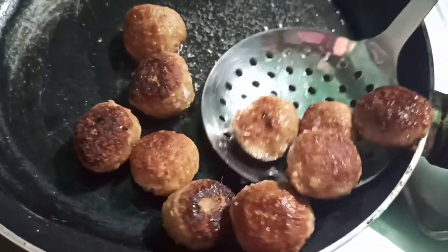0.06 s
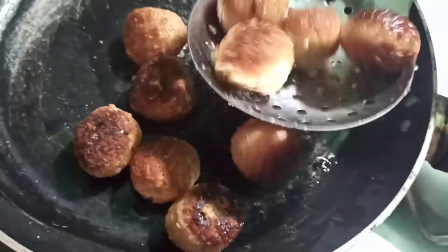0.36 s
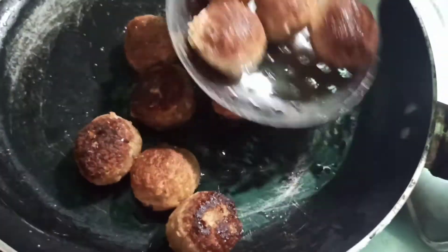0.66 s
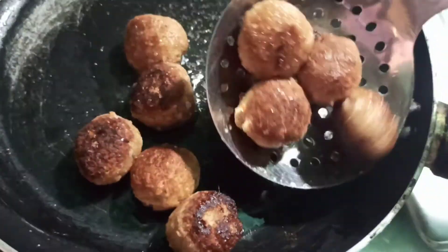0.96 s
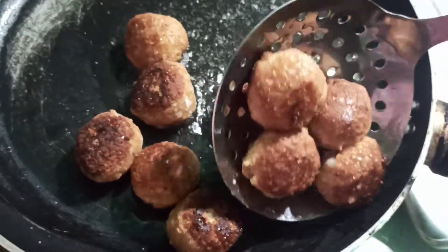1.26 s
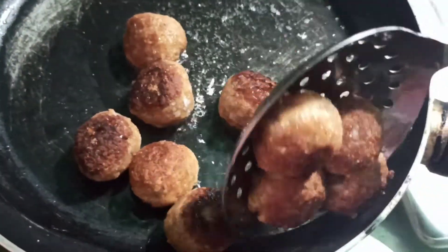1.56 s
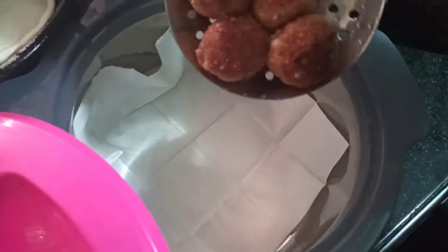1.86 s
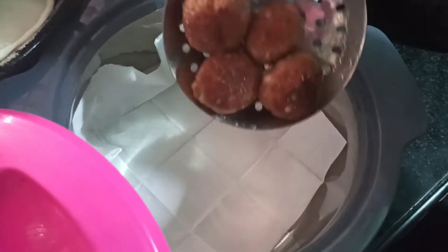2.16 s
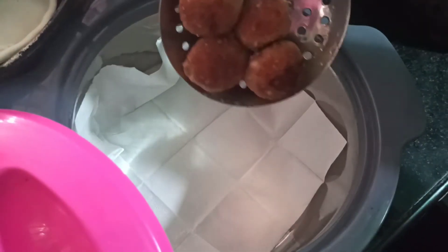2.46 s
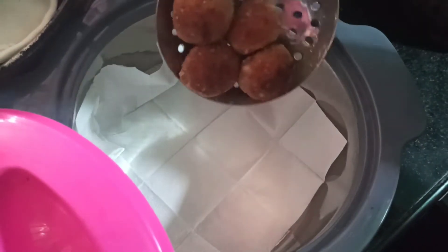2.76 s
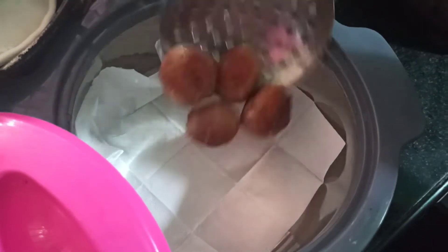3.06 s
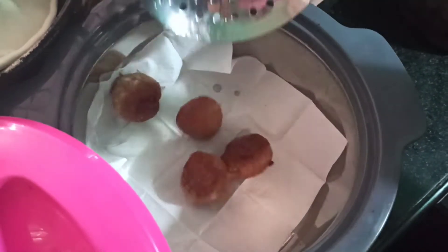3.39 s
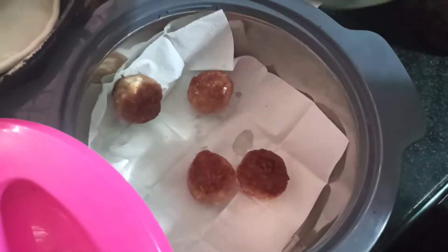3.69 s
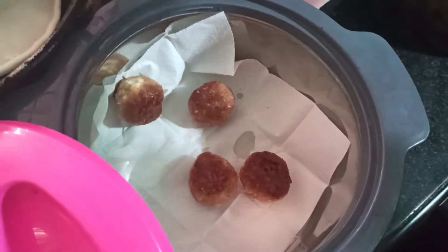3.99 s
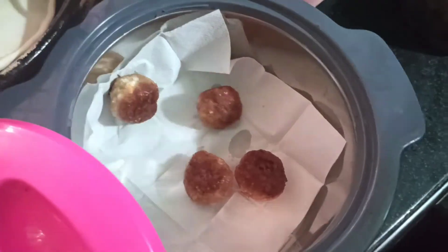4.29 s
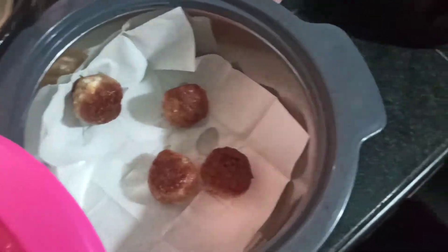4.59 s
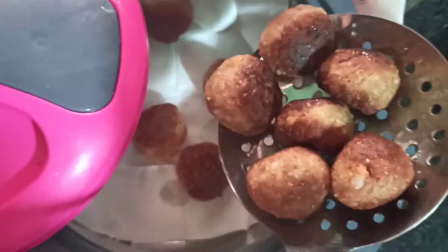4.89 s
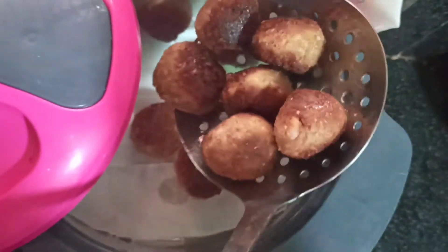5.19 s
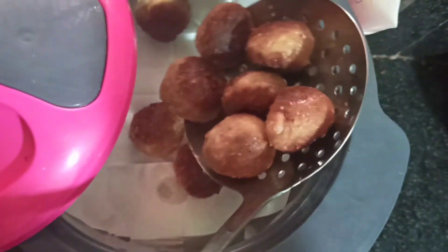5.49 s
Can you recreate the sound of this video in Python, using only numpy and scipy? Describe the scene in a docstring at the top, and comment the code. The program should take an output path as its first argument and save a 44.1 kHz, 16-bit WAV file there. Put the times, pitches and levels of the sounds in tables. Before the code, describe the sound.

A metal skimmer clinks and bumps in sizzling oil; the sizzle softens as it knocks a container and drops soft fried food inside.

```python
"""Skimming fried balls from hot oil

Steam bubbles burst in a pan of oil while a steel skimmer gathers fried balls, scraping, clinking and
bumping the pan. Further from the stove the sizzle is softer; the skimmer knocks on a container and
the balls bounce on its paper lining. Near the end the sizzle is fainter still; one more knock rings."""
import sys
import numpy as np
from scipy import signal
from scipy.fft import rfft, irfft
from scipy.io import wavfile
from scipy.ndimage import uniform_filter1d

SR = 44100
rng = np.random.default_rng(int(sys.argv[2]) if len(sys.argv) > 2 else 0)


def generate_wav(signal):
    """Clip the signal to [-1, 1] and save it as 16-bit WAV at the path in sys.argv[1]."""
    frames = np.transpose(np.atleast_2d(signal))
    scaled = np.clip(frames, -1, 1) * 32767
    pcm = np.round(scaled).astype(np.int16)
    wavfile.write(sys.argv[1], SR, pcm)


N = 253134


def amp(db):
    """Decibels to gain."""
    return 10 ** (np.asarray(db) / 20)


def unit(x):
    """Scale to rms 1."""
    return x / np.sqrt(np.mean(x ** 2) + 1e-20)


def read(points, hz):
    """Interpolate a table on a log-frequency axis."""
    points_hz, values = np.transpose(points)
    return np.interp(np.log(hz + 1), np.log(points_hz + 1), values)


def at(start_s, sound):
    """Full-length stereo track with the sound at start_s."""
    out = np.zeros((2, N))
    part = out[:, round(start_s * SR):][:, :sound.shape[1]]
    part += sound[:, :part.shape[1]]
    return out


def colour(x, db_at, size=2048):
    """Minimum-phase filter with gain db_at(hz)."""
    hz = abs(np.fft.fftfreq(size, 1 / SR))
    log_gain = np.log(amp(np.maximum(db_at(hz), -100)))
    taps = np.fft.ifft(np.exp(np.conj(signal.hilbert(log_gain)))).real
    return signal.oaconvolve(x, taps[None], axes=1)[:, :x.shape[1]]


def band(hz, centre_hz, octaves):
    """Bell in dB, 3 dB down at +/- octaves."""
    return -10 * np.log10(1 + (np.log2((hz + 1) / centre_hz) / octaves) ** 4)


def lean(x, balance):
    """Left-right balance per band."""
    left = colour(x[:1], lambda hz: read(balance, hz) / 2)
    right = colour(x[1:], lambda hz: -read(balance, hz) / 2)
    return np.vstack([left, right])


# Diffuse field: (frequency [Hz], left-right coherence [0-1])
COHERENCE = [(60, 0.51), (300, 0.6), (700, 0.6), (1400, 0), (3000, 0.03)]

def diffuse(count):
    """Stereo noise, bass partly shared by both sides."""
    left, independent = rfft(rng.standard_normal((2, count)))
    shared = read(COHERENCE, np.fft.rfftfreq(count, 1 / SR))
    right = shared * left + np.sqrt(1 - shared ** 2) * independent
    return irfft([left, right], count)


def dying(t60_at, count):
    """Diffuse noise with a decay time per band."""
    hz, t, spectrum = signal.stft(diffuse(count), SR, nperseg=256)
    decay = np.exp(-np.log(1000) * t / t60_at(hz)[:, None])
    return signal.istft(spectrum * decay, SR, nperseg=256)[1][:, :count]


def ring(modes, t, spread_rad):
    """Decaying modes; higher ones reach the two sides out of phase."""
    hz, db, t60_s = np.transpose(modes)[:, :, None]
    lag = spread_rad * np.minimum(hz / 1000, 2) * rng.standard_normal((2, len(modes), 1))
    phase = 2 * np.pi * rng.random((len(modes), 1))
    return (amp(db - 60 * t / t60_s) * np.sin(2 * np.pi * hz * t + phase + lag)).sum(1)


def band_noise(centre_hz, octaves):
    """One second of diffuse band noise, rms 1."""
    return unit(colour(diffuse(SR), lambda hz: band(hz, centre_hz, octaves)))


def swell(rise_s, fade_s):
    """Envelope: square-root rise, exponential fade."""
    t = np.arange(SR) / SR
    return np.sqrt(np.minimum(t / rise_s, 1)) * np.exp(-np.maximum(t - rise_s, 0) / fade_s)


def arch(length_s):
    """Envelope: even movement, soft start and stop."""
    progress = np.minimum(np.arange(SR) / SR / length_s, 1)
    return np.sqrt(abs(np.sin(np.pi * progress)))


# Kitchen noise: (frequency [Hz], level [dB])
BACKGROUND_SPECTRUM = [(20, -38), (42, -43), (62, -0.5), (82, -3.5), (150, 2.5), (260, -2), (450, -6.5),
                       (800, -8.5), (1400, -12.5), (2200, -17), (6000, -16), (16000, -40)]

def background(level_db=-55):
    """Low steady rush of the kitchen."""
    return amp(level_db) * unit(colour(diffuse(N), lambda hz: read(BACKGROUND_SPECTRUM, hz), size=8192))


# Stove, then two spots at the counter, each switching in quickly: (time [s], switch [s], gain [dB], drift
# [dB/s], near share [0-1])
LISTENING_PLACES = [(0, .01, -42, 0, 0.85), (1.96, 0.11, -49.5, 0.66, 0.38), (5.03, 0.021, -63.5, 7, 0.05)]

def listening_place():
    """Gain and near share of the sizzle; each place fades in over the previous one."""
    t = np.arange(N) / SR
    _, _, gain_db, _, near_share = LISTENING_PLACES[0]
    for start_s, switch_s, db, drift_db_per_s, share in LISTENING_PLACES:
        arrived = np.clip((t - start_s) / switch_s, 0, 1)
        gain_db += arrived * (db + drift_db_per_s * (t - start_s) - gain_db)
        near_share += arrived * (share - near_share)
    return gain_db, near_share


# Bursting bubbles, close by and across the counter: (frequency [Hz], level [dB])
NEAR_SPECTRUM = [(200, -17.5), (700, -10.5), (1500, -8), (2800, -6), (4200, -1.5), (5500, 0), (7400, 3),
                 (9000, -2.5), (12000, -5.5), (15500, -7.5)]
FAR_SPECTRUM = [(200, -6), (700, 1.5), (1500, 0.5), (2400, 0), (4300, 3), (5000, -1), (7400, -2.5),
                (9000, -14), (12000, -1), (15500, 5.5)]
# Fizz, stronger on the left: (frequency [Hz], left minus right [dB])
SIZZLE_BALANCE = [(500, -5), (2300, -2), (4200, 1), (6000, 4.5), (7400, 0), (8600, 8.5), (12000, 12.5),
                  (15000, 5.5)]

def sizzle(pops_per_s=2500, pops_db=-3, flicker_db=0.38, near_db=2.5, far_db=3.5):
    """Tiny steam bubbles merge into a hiss; larger ones burst as separate pops."""
    bursting = rng.random(N) < pops_per_s / SR
    pops = amp(pops_db) * unit(bursting * rng.standard_normal((2, N)))
    flicker = unit(uniform_filter1d(uniform_filter1d(rng.standard_normal(N), size=500), size=300))
    hiss = rng.standard_normal((2, N))
    bubbles = lean((hiss + pops) * amp(flicker_db * flicker), SIZZLE_BALANCE)
    near = amp(near_db) * unit(colour(bubbles, lambda hz: read(NEAR_SPECTRUM, hz)))
    far = amp(far_db) * unit(colour(bubbles, lambda hz: read(FAR_SPECTRUM, hz)))
    gain_db, near_share = listening_place()
    return amp(gain_db) * (near_share * near + (1 - near_share) * far)


def ball_roll(start_s=0.28, level_db=-52):
    """A ball slips off the skimmer and rolls across the pan."""
    rumble = band_noise(centre_hz=231, octaves=0.25)
    return at(start_s, amp(level_db) * arch(length_s=0.14) * rumble)


def oil_flare(start_s=0.4, level_db=-40.5):
    """Oil stirred by the ball briefly hisses louder."""
    hiss = band_noise(centre_hz=4500, octaves=1.16)
    return at(start_s, amp(level_db) * swell(rise_s=0.037, fade_s=0.11) * hiss)


# Skimmer strokes: (time [s], length [s], level [dB], centre [Hz])
SKIMMER_SCRAPES = [(.43, 0.042, -39.5, 6800), (0.919, .045, -38.5, 3070), (2.569, .09, -56.5, 846),
                   (4.545, .025, -48.5, 3500), (4.945, 0.087, -47.5, 3040)]

def scrapes(rise_share=0.35):
    """Friction as the skimmer scrapes and shifts its load."""
    out = np.zeros((2, N))
    for start_s, length_s, db, hz in SKIMMER_SCRAPES:
        envelope = swell(rise_share * length_s, (1 - rise_share) * length_s)
        out += at(start_s, amp(db) * envelope * band_noise(hz, octaves=0.75))
    return out


# Rim strikes: (time [s], level [dB], spot emphasis [Hz], tick [dB], t60 factor [x])
RIM_STRIKES = [(.4775, -30, 7500, 5, .4), (.4815, -26.5, 7900, 5, 0.26), (1.078, -16.5, 4770, 0, 0.73),
               (1.0845, -22.5, 5100, 1.5, 0.89), (3.1222, -18, 9200, -12, 1),
               (4.424, -47.5, 7000, 12.5, .3)]
# Skimmer modes: (frequency [Hz], level [dB], t60 [s])
SKIMMER_MODES = [(3740, -5, .08), (4619, -4, .08), (4727, 0, .08), (4855, -6, .06), (5093, -6, .09),
                 (6508, 0, .08), (6697, -6, .15), (7417, -10, .06), (7908, 0, .2), (12320, 1, .15),
                 (12820, 1, .11)]

def clinks(tick_s=0.0035, ring_db=-4.5):
    """The steel rim ticks and rings, most in the modes the struck spot favours; its load damps it."""
    out, t = np.zeros((2, N)), np.arange(SR // 3) / SR
    for start_s, db, spot_hz, tick_db, t60_factor in RIM_STRIKES:
        tick = amp(tick_db) * np.exp(-t / tick_s) * diffuse(len(t))
        tick = colour(tick, lambda hz: band(hz, 0.92 * spot_hz, octaves=0.55))
        steel = ring(np.array(SKIMMER_MODES) * [1, 1, t60_factor], t, spread_rad=0.35)
        steel = colour(steel, lambda hz: band(hz, spot_hz, octaves=0.17))
        out += at(start_s, amp(db) * (tick + amp(ring_db) * steel))
    return out


def blows(hits, modes, body, push_db, crack_db, crack_s, wall_db, wall_t60_s, modes_db):
    """Struck vessel: push, crack, dense wall clatter and a few long modes; soft food dulls them."""
    out, t = np.zeros((2, N)), np.arange(SR // 2) / SR
    push = amp(push_db) * np.array([t == t[5], t == 0])  # right leads by 5 samples
    for start_s, db, corner_hz, clatter_db, ring_db, spot_hz, lift_db in hits:
        crack = amp(crack_db) * np.exp(-t / crack_s) * diffuse(len(t))
        clatter = amp(wall_db + clatter_db) * dying(lambda hz: wall_t60_s / (1 + hz / 4000), len(t))
        hit = colour(push + crack + clatter, lambda hz: read(body, hz))
        hit += amp(modes_db + ring_db) * ring(modes, t, spread_rad=0.77)

        def contact_db(hz):
            """The struck spot lifts the modes that move most there; longer contact cuts treble."""
            spot_db = lift_db * amp(band(hz, spot_hz, octaves=0.28))
            return spot_db - 10 * np.log10(1 + (hz / corner_hz) ** 2)

        out += at(start_s, amp(db) * colour(hit, contact_db))
    return out


# Skimmer on pan: (time [s], level [dB], corner [Hz], clatter [dB], ring [dB], spot [Hz], lift [dB])
PAN_HITS = [(1.2049, -11, 14000, -0.5, -1, 2750, 3.8), (1.2172, -13, 700, 5.5, 6, 367, 4.2)]
# Pan modes: (frequency [Hz], level [dB], t60 [s])
PAN_MODES = [(226, -0.5, 0.58), (276, 2.5, 0.31), (356, -2.5, 0.36), (429, -2, 0.36), (589.5, 9.5, 0.18),
             (916, -4, 0.16), (1920, -4, 0.18), (2740, -10, 0.087), (3263, 1, .14)]
# Broad pan response: (frequency [Hz], gain [dB])
PAN_RESPONSE = [(40, -40), (110, -0.5), (280, 2), (600, 0), (1000, 3), (1400, -4.5), (2200, -6.5),
                (2700, -2.5), (4200, -7.5), (7000, 5), (9000, -8), (15000, -11)]

def pan_bumps():
    """The skimmer bumps the pan and sets it ringing."""
    return blows(PAN_HITS, PAN_MODES, PAN_RESPONSE, push_db=11, crack_db=-5, crack_s=0.0031,
                 wall_db=-14.5, wall_t60_s=0.28, modes_db=-31.5)


# Squeaks: (time [s], length [s], level [dB], pitch [Hz])
FAINT_SQUEAKS = [(2.151, 0.32, -64.5, 1280), (2.88, .36, -63, 1430), (4.98, .27, -56.5, 1310),
                 (5.11, .11, -61.5, 1700)]

def squeaks():
    """Faint narrow-band rubbing."""
    return sum(at(start_s, amp(db) * arch(length_s) * band_noise(hz, octaves=0.075))
               for start_s, length_s, db, hz in FAINT_SQUEAKS)


# Skimmer on container:
# (time [s], level [dB], corner [Hz], clatter [dB], ring [dB], spot [Hz], lift [dB])
CONTAINER_HITS = [(3.1219, -2, 16000, -0.5, -0.5, 1100, 4.5), (3.1268, -3.5, 4500, -3, 7, 2780, 6.5),
                  (3.1425, -4, 510, 1, -2, 360, 5), (3.1755, -10, 4500, -0.5, 3.5, 1110, 3.5),
                  (5.6497, -4, 2800, -7, -4, 1180, 9.5), (5.6568, -16, 3000, 0, 6.5, 616, 10)]
# Container modes: (frequency [Hz], level [dB], t60 [s])
CONTAINER_MODES = [(174.4, -4, 0.22), (253, -3, 0.13), (366, 1.5, 0.12), (440, -3.5, 0.11),
                   (616.4, 4, 0.19), (720, -16, 0.14), (860, -11, 0.18), (1063, -2, 0.14), (1217, -4, 0.13),
                   (1387, -11.5, 0.3), (1690, -6, 0.13), (2010, -3, 0.12), (2443, -6.5, 0.16)]
# Broad container response: (frequency [Hz], gain [dB])
CONTAINER_RESPONSE = [(40, -36), (100, -2.5), (170, 0), (300, 4), (500, -0.5), (650, 5.5), (1050, -2),
                      (1700, 0.5), (2700, -6), (4500, -6), (7000, 1), (9000, -12), (15000, -12)]

def container_knocks():
    """The skimmer knocks on the container; its wall clatters and rings."""
    return blows(CONTAINER_HITS, CONTAINER_MODES, CONTAINER_RESPONSE, push_db=8.5, crack_db=-4.5,
                 crack_s=0.0039, wall_db=-15, wall_t60_s=0.27, modes_db=-29.5)


# Balls on lining: (time [s], level [dB], corner [Hz], clatter [dB], ring [dB], spot [Hz], lift [dB])
LINING_HITS = [(3.2071, -4, 2000, -10, -8.5, 814, 4.6), (3.2225, -8, 1800, 2, -9, 700, 3.5),
               (3.3995, -13.5, 1200, -2, -9, 700, 2.9)]
# Broad response of the lined floor: (frequency [Hz], gain [dB])
LINING_RESPONSE = [(40, -31), (110, -10), (190, -0.5), (450, -3.5), (820, 5), (1100, -7.5), (2200, -9),
                   (4500, -4), (9000, -11), (15000, -14)]

def ball_landings():
    """Soft balls thud and bounce on the container's paper-lined floor."""
    return blows(LINING_HITS, CONTAINER_MODES, LINING_RESPONSE, push_db=13.5, crack_db=-8.5,
                 crack_s=0.0045, wall_db=-14.5, wall_t60_s=0.13, modes_db=-32.5)


def paper_crumple(start_s=3.2164, level_db=-22.5):
    """The lining crumples under the falling balls."""
    rustle = band_noise(centre_hz=6940, octaves=0.9)
    return at(start_s, amp(level_db) * swell(rise_s=0.0033, fade_s=0.0097) * rustle)


# Kitchen decay: (frequency [Hz], t60 [s])
KITCHEN_T60 = [(100, 0.16), (400, 0.53), (1000, 0.39), (3000, 0.49), (8000, 0.24), (15000, 0.23)]

def kitchen_reverb(x, build_s=0.013):
    """Reflections build up quickly and die away."""
    t = np.arange(SR) / SR
    tail = dying(lambda hz: read(KITCHEN_T60, hz), SR) * (1 - np.exp(-t / build_s))
    return signal.fftconvolve(x, tail / np.linalg.norm(tail[0]), axes=1)[:, :N]


# Utensils, treble mostly left: (frequency [Hz], left minus right [dB])
UTENSIL_BALANCE = [(150, -1.5), (400, -3), (1000, 2), (2500, -3.5), (4500, 3.5), (7000, -1), (8500, 5.5),
                   (13000, 9.5)]

def scene():
    """Utensils and their reverb over sizzle and background; the close clinks are drier."""
    steady = background() + sizzle()
    handling = ball_roll() + oil_flare() + scrapes() + pan_bumps() + squeaks()
    handling += container_knocks() + ball_landings() + paper_crumple()
    steel = clinks()
    reverb = kitchen_reverb(amp(-13.5) * handling + amp(-16) * steel)
    return steady + lean(handling + steel + reverb, UTENSIL_BALANCE)


# Overall tone; bass cut, bright lift at 6-8.5 kHz, deep gap near 11 kHz: (frequency [Hz], gain [dB])
OVERALL_TONE = [(25, -6), (65, 0), (4500, 0.5), (4800, -3), (6000, -3), (6350, 4), (8450, 4.5),
                (8750, -4.5), (10200, -9.5), (10800, -30), (11300, -52), (11600, 1)]

def record(dry):
    """Overall tone, then band limit."""
    heard = colour(dry, lambda hz: read(OVERALL_TONE, hz))
    lowpass = signal.firwin(401, cutoff=15650, window=("kaiser", 9), fs=SR)
    return signal.oaconvolve(heard, lowpass[None], "same")


dry = scene()
out = record(dry)
generate_wav(out)
```